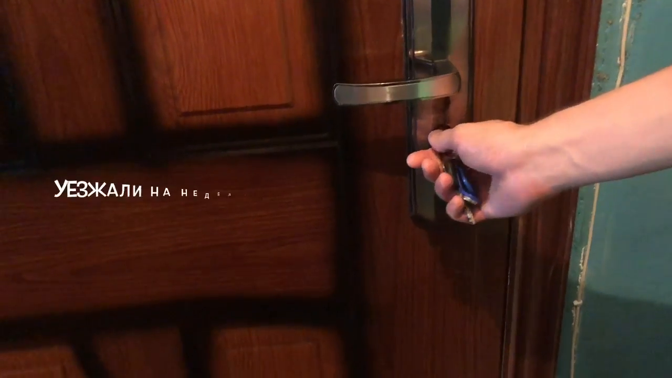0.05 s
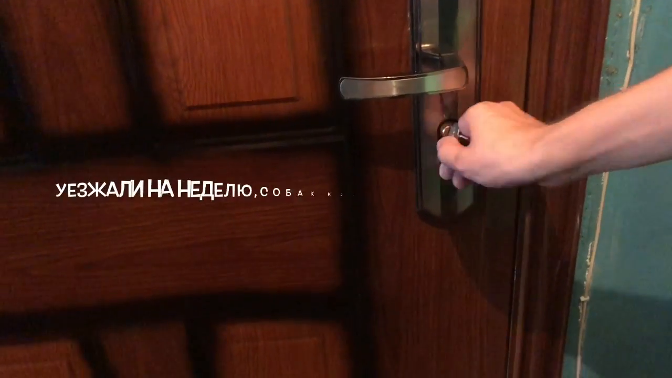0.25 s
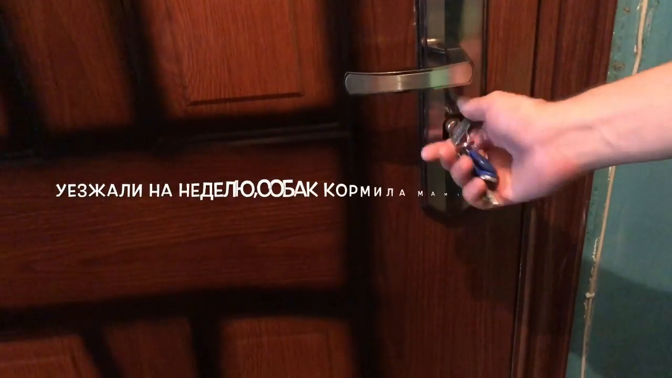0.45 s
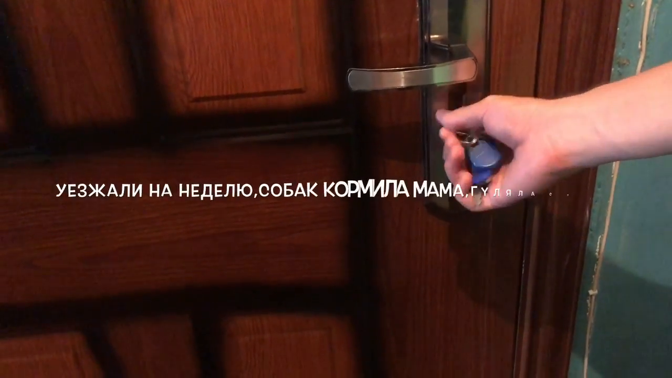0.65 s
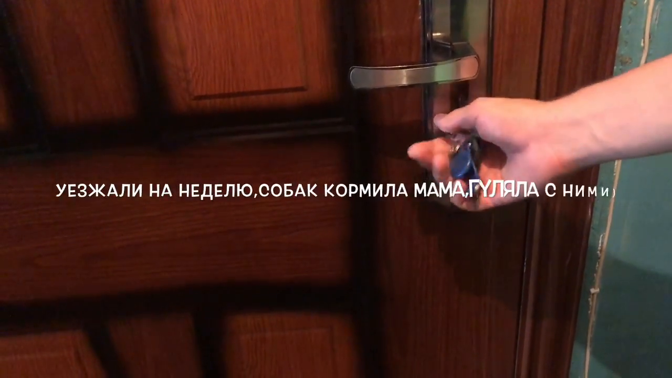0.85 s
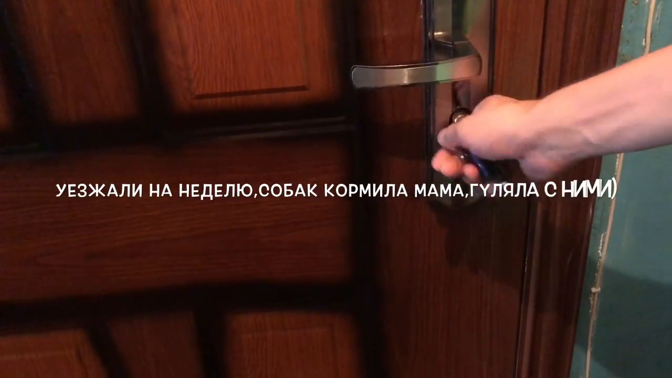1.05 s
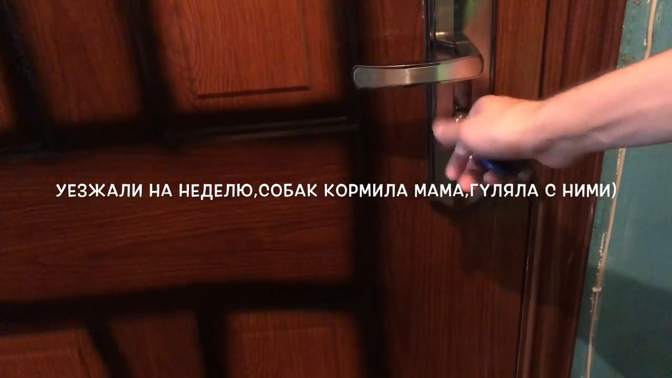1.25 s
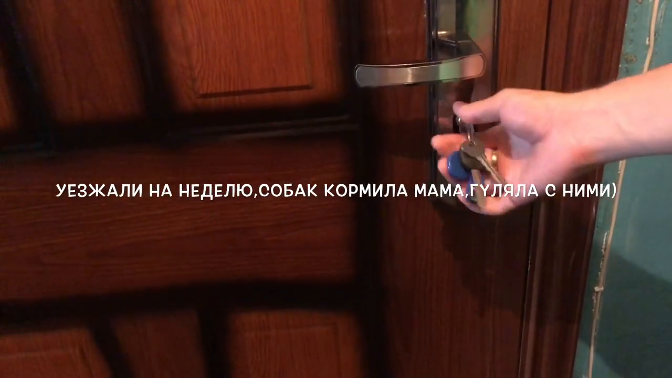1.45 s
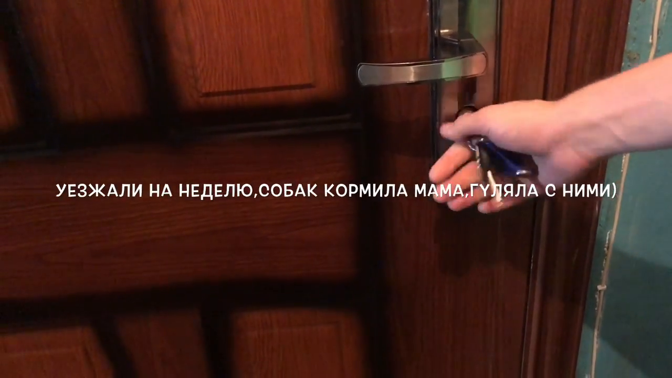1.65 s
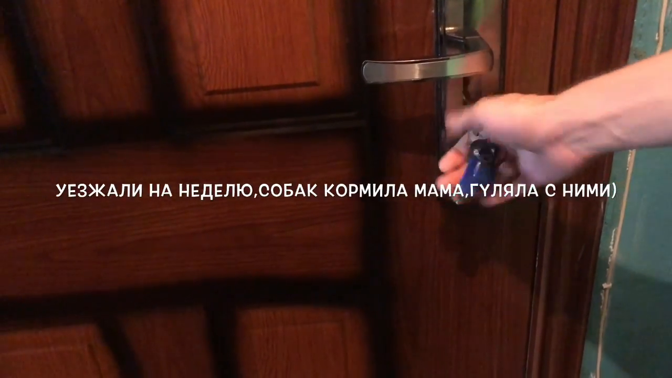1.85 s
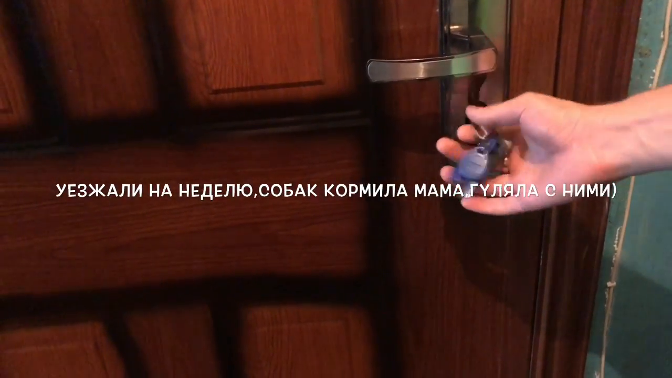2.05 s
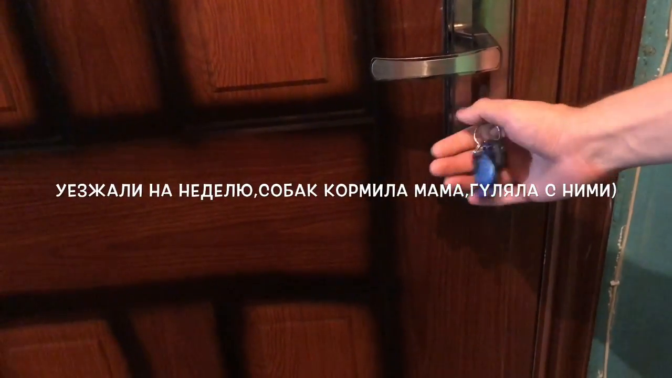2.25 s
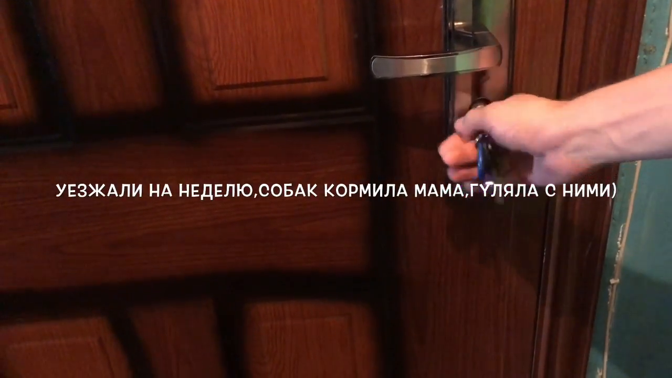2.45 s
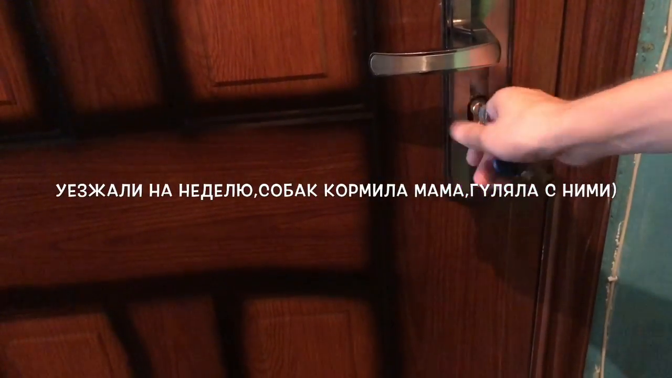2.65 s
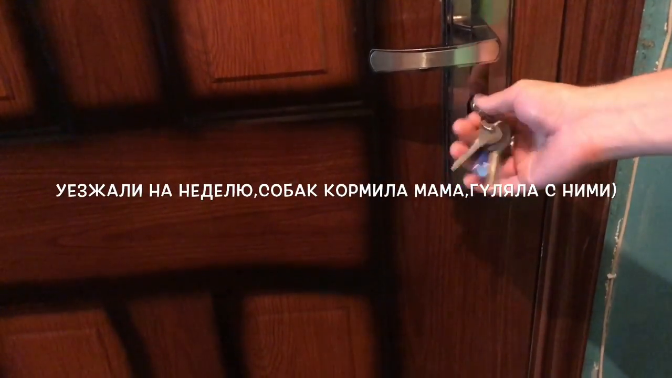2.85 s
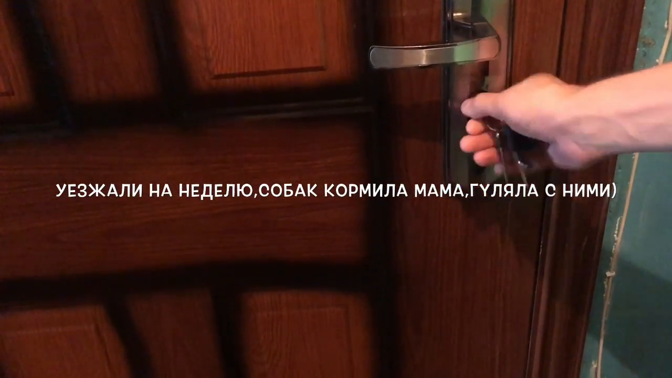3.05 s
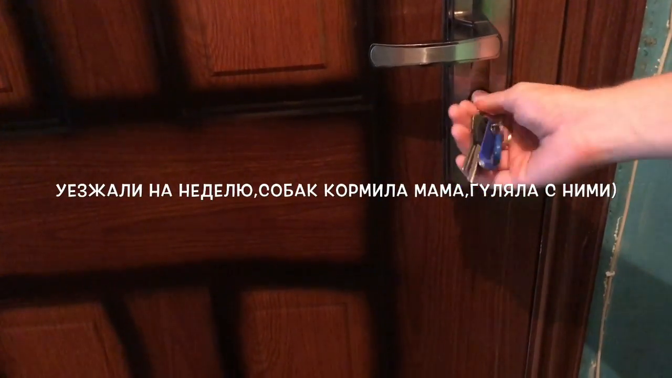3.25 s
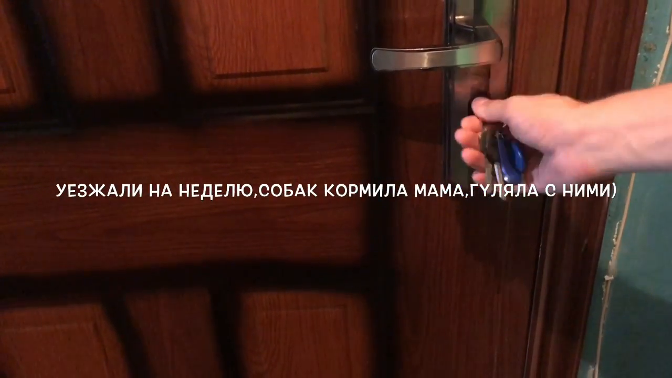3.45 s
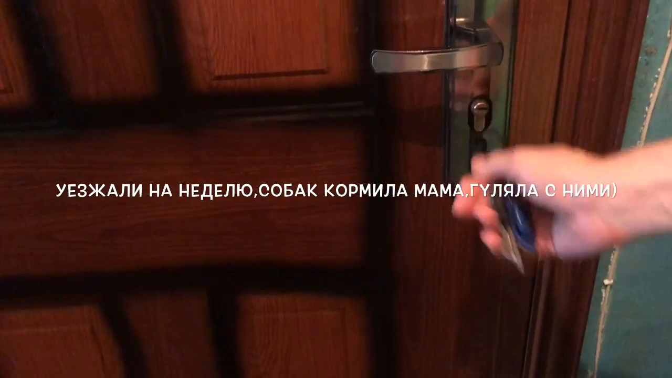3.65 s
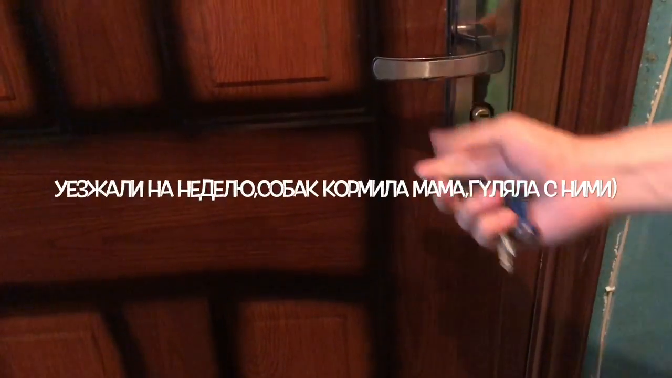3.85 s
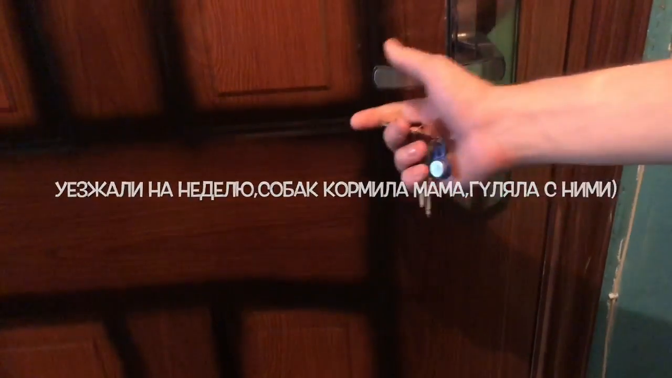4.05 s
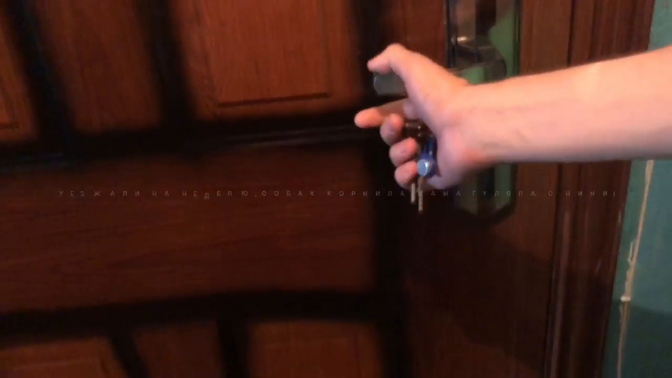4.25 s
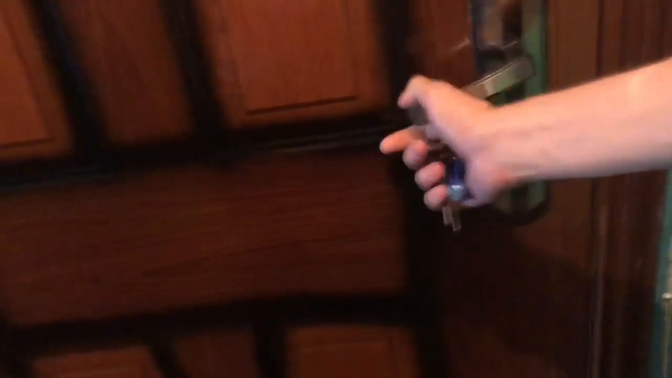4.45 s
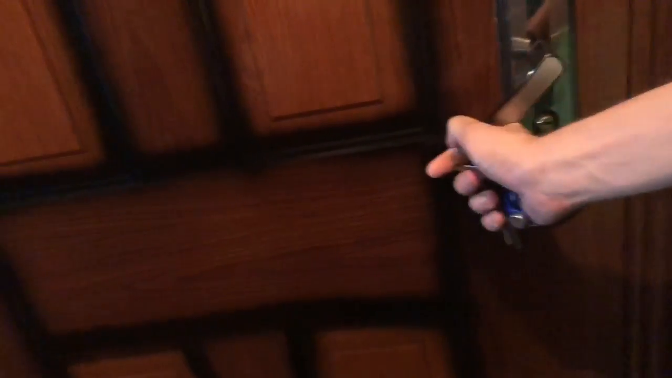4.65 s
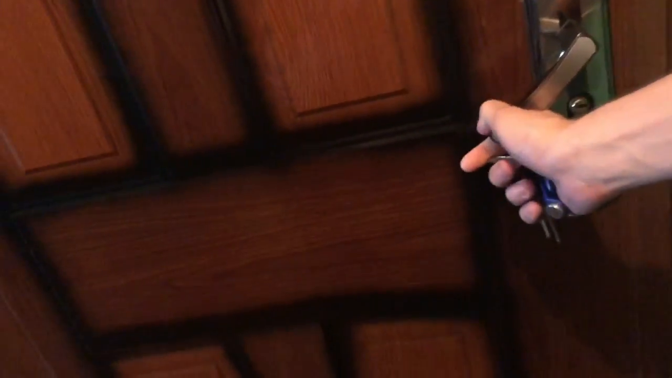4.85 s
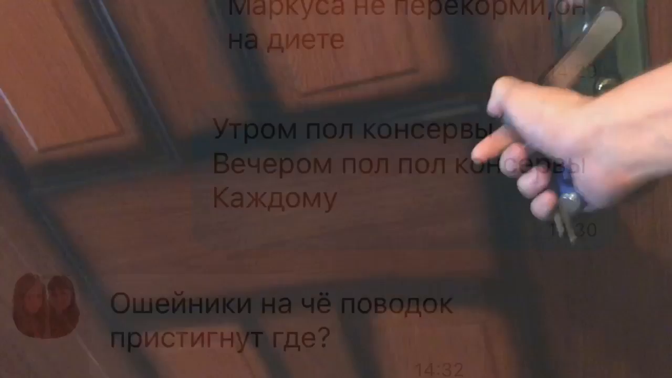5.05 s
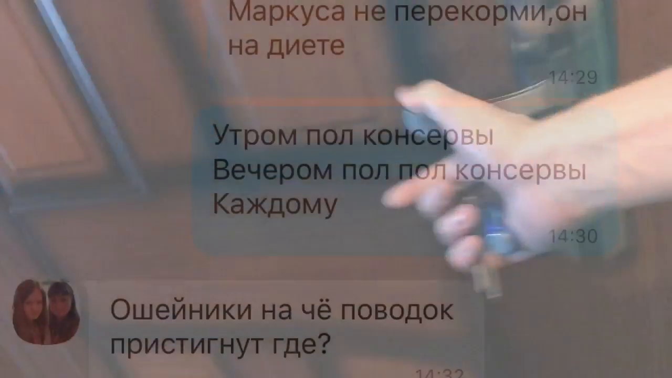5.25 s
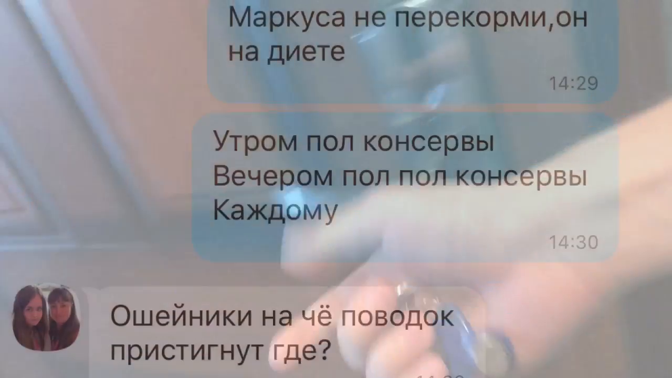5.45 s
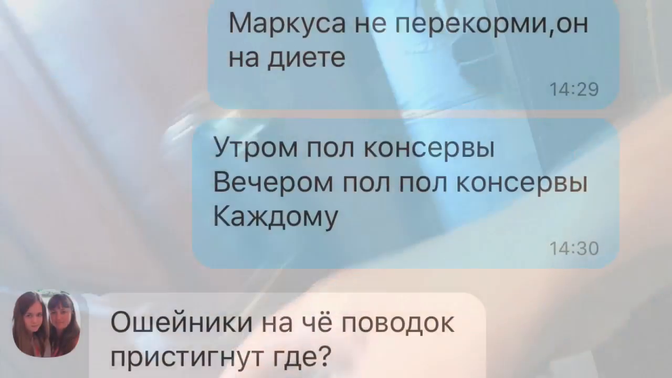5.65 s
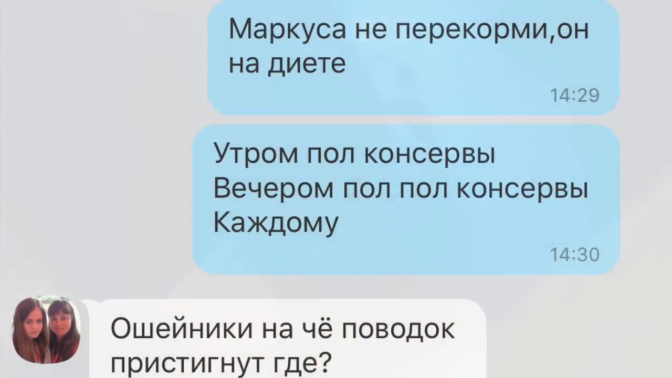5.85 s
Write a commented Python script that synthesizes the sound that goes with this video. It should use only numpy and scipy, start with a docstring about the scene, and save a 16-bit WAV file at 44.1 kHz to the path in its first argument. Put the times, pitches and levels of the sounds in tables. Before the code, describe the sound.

In a hard, echoing stairwell, with soft hiss and low rumble, keys are heard at about arm's length. From 0.2 s they clink lightly, with a tiny knock at 0.4 and a faint low hum around 0.5-1.3. A dense jingle at 0.7-1.05 leads into two firm bolt clacks at 1.1 and 1.2, resounding in the door leaf. After a short lull, the keys rattle again from 1.5, brightest and busiest at 1.85-2.25, then hard lock clacks follow at 2.5-2.65. More sharp clinks come at 2.95-3.35. From 3.55 to 4.05 the key scrapes out amid jingling, with a strong clink at 3.8 and a tap leaving a thin metallic ring at 4.0. Then the keys fall quiet: small knocks, handle clunks at 4.6-4.7 with deep thuds, the door shifting around 4.9, light clicks at 5.2-5.4, rubbing, and a barely audible rising hinge squeak at 5.5 as everything fades.

```python
"""Keys clink and rattle in the hand, bolt and latch knock the door leaf, and a hinge squeaks faintly at the end.
The bunch turns twice in a steel door lock on a hard stairwell landing, is pulled out, and the handle is pressed.
Keys and lock are bursts of chattering noise driving resonances; lever, hinge and a low hum are sines.
Shaped noise makes the hand on the door, the rubbing metal and the air; decaying noise makes the echo."""
import sys
import numpy as np
from scipy import signal
from scipy.fft import rfft, irfft, next_fast_len
from scipy.io import wavfile
from scipy.ndimage import map_coordinates

SR = 44100
rng = np.random.default_rng(int(sys.argv[2]) if len(sys.argv) > 2 else 0)


def log_audio(samples):
    """Write samples as a 16-bit WAV file to the path given in sys.argv[1]."""
    # one column per channel
    frames = np.atleast_2d(samples).T
    # limit to full scale, then quantise
    limited = np.clip(frames, -1, 1)
    pcm = np.round(limited * 32767).astype(np.int16)
    wavfile.write(sys.argv[1], SR, pcm)


N = 260190  # samples, 5.9 s

# Key on key. Each row: start in seconds, level in dB, ring pitch in Hz, balance of the long keys in dB,
# decay time of the contact in ms.
CLINKS = [(0.218, -22.5, 14500, -16, 3.7), (0.277, -29, 15600, -13.5, 7.7), (0.504, -39, 15500, -36, 21),
          (0.534, -36.5, 15500, -40, 5.8), (0.6744, -22, 15700, -3, 5), (0.7764, -21.5, 13540, -21.5, 10.4),
          (0.8041, -22.5, 7700, -13, 5.3), (0.8218, -24, 12140, -10, 6.8), (0.888, -30, 14370, -18.5, 2.1),
          (0.897, -20.5, 15000, -0.5, 1.4), (0.921, -28.5, 11100, -12, 1.6), (0.9288, -25, 7740, -8, 7),
          (1.0132, -21.5, 10200, -4, 10.4), (1.0332, -25, 7460, -6, 22), (1.055, -23.5, 14700, -22, 1.8),
          (1.5235, -37, 7770, -3.5, 4.8), (1.5556, -35, 3620, 2.5, 4), (1.627, -37.5, 5200, -3, 2),
          (1.646, -32.5, 12300, 2.5, 8), (1.6878, -28, 4500, 0, 2.8), (1.746, -23.5, 15500, -1, 2.6),
          (1.7797, -24.5, 4800, 2, 2.8), (1.8204, -32, 14980, 3, 8.1), (1.8662, -9, 10800, -6.5, 4.6),
          (1.894, -26, 8000, -18, 6.8), (1.9022, -17.5, 10900, -3.5, 6.1), (1.9141, -22.5, 10940, -28, 2.4),
          (1.993, -28.5, 14900, 2, 4.5), (2.0016, -18, 7460, -11, 8.7), (2.0052, -20.5, 7750, 1, 2.6),
          (2.042, -25, 14970, -6, 3.8), (2.052, -19, 14800, -35, 3.3), (2.124, -28, 11700, -11, 3.9),
          (2.148, -22, 14900, 1.5, 0.75), (2.1807, -15.5, 11540, -5.5, 5.9), (2.189, -19, 7700, -21.5, 7.1),
          (2.253, -30, 7940, -5, 7.4), (2.509, -35, 5560, -12, 1.5), (2.752, -24.5, 7700, -3.5, 1.4),
          (2.7568, -25.5, 3500, -1, 1.7), (2.933, -40.5, 3580, 7, 3.5), (2.965, -22.5, 9460, -22, 5.6),
          (3.0103, -14, 12520, -11, 4.6), (3.0178, -15.5, 11800, -13.5, 2.6), (3.067, -21, 15900, -10, 2.8),
          (3.0763, -19, 14400, -16.5, 3.9), (3.087, -26, 15000, -7, 1.3), (3.168, -25, 15040, -10.5, 4.3),
          (3.289, -18.5, 15150, -12, 2.5), (3.296, -26.5, 14400, -13, 11), (3.3375, -28, 15200, -26, 2.6),
          (3.543, -18, 12500, -7, 8.8), (3.5775, -25.5, 8100, -9, 17), (3.613, -26.5, 12360, -2, 4.9),
          (3.6328, -21.5, 12800, -25, 0.47), (3.6705, -26, 14400, -6, 5), (3.7773, -20, 15200, -15.5, 22),
          (3.803, -10, 14500, -23, 2), (3.812, -33, 7740, -13, 3.8), (3.837, -30.5, 7600, 1, 6.5),
          (3.8633, -37, 14900, -12, 7.6), (3.8934, -32, 14500, 5, 3.4), (3.902, -25.5, 8500, -14, 4.8),
          (3.9136, -20.5, 15100, -9, 5), (3.9936, -16.5, 7250, -8.5, 4), (4.001, -22.5, 11500, -5, 5.3),
          (4.018, -25, 15000, 0, 0.83), (4.051, -24.5, 16000, -4, 1.1)]
# Blows of bolt, latch and handle. Each row: start in seconds, clack level in dB, door leaf in dB against
# the clack, depth of the thud in dB, steel snap in dB against the clack.
KNOCKS = [(0.4339, -40.5, -8.5, -6, -10.5), (0.7821, -39.5, -6, -6, 0.5), (1.0988, -27.5, -2, 3.5, -8.5),
          (1.1866, -22.5, -5.5, 2.5, -8), (1.6909, -34, -1.5, 3.5, -2), (2.4981, -34.5, 1, 0, -3),
          (2.5169, -24, -3.5, -0.5, -1.5), (2.6276, -22, -26, -6, -7), (2.6334, -27, 5, 1, 5.5),
          (3.5367, -40, 4, 2, -8), (3.5989, -49, 11.5, 6, 6), (3.6388, -58.5, 15, -2, -8),
          (3.6844, -34.5, -7, -7.5, -17), (4.12, -44.5, -3, 10.5, -7), (4.2938, -49.5, -1.5, -5, 8),
          (4.4248, -40.5, 1.5, 5, -10), (4.5943, -35.5, -14.5, 16.5, -5.5), (4.6121, -30, -8.5, 3, 0),
          (4.6885, -27, 1.5, 3, -4), (4.7355, -45, 5, -4, 4), (4.8997, -47, -18, 21, -2),
          (5.08, -43.5, -3, 7, -7.5), (5.1494, -46, -5, -7.5, -9), (5.2352, -50, 5.5, -6.5, -27),
          (5.3047, -44, -20, 4, -0.5), (5.3324, -35.5, -3, 3, -5), (5.3727, -38.5, -1, -5.5, 5.5)]
# The faint hinge squeak: start in seconds, hold in seconds, level in dB.
SQUEAK = (5.5, .14, -68)
# The lever ringing after a key taps it. Each row: pitch in Hz, level in dB, t60 in seconds.
LEVER_RINGS = [(2350, -59, .3), (7176, -43, .62), (11390, -45, .35)]
# Resonances of the door leaf. Each row: centre in Hz, width in Hz, relative level in dB.
DOOR_MODES = [(131.2, 49.5, 0), (196.4, 25, 5.5), (265, 30, 3), (343.3, 45, 2), (445.7, 49, -1.5),
              (589, 145, -6), (947, 690, -11.5)]
# Tone of the clack in the lock case. Each row: frequency in Hz, relative density in dB per Hz.
LOCK_CASE_TONE = [(700, 1.5), (1150, 6), (1650, 2.5), (2300, -4.5), (3500, -11), (5000, -31)]
# Tone of the snap in the steel bolt. Each row: frequency in Hz, relative density in dB per Hz.
BOLT_TONE = [(1350, -7), (2300, -6.5), (3200, -7.5), (3700, -1.5), (4300, -6.5), (6040, -4.5), (6800, -9),
             (8400, -7), (12500, -12.5), (16000, -12)]
# Resonances of the lock plate. Each row: centre in Hz, width in Hz, relative level in dB.
PLATE_MODES = [(3666, 100, 0), (4340, 30, -3.5), (5460, 43, -11), (5810, 81, -6.5), (7170, 82, -8.5),
               (8640, 31, -8.5), (9020, 38, -9)]
# Tone of the low rumble. Each row: frequency in Hz, relative density in dB per Hz.
RUMBLE_TONE = [(20, -70), (28, -48), (38, -13), (45, 0.5), (60, 11), (90, -1), (140, -40.5)]
# Tone of the stairwell hiss. Each row: frequency in Hz, relative density in dB per Hz.
HISS_TONE = [(200, -6), (480, -19), (890, -20.5), (6770, -39.5), (9800, -43), (16000, -64.5)]
# Echo decay of the stairwell. Each row: frequency in Hz, t60 in seconds.
ECHO_DECAY = [(100, 0.96), (700, 0.73), (1840, 1.17), (4850, 1.08), (12800, 0.38)]
# Treble limit of the whole scene, a steep drop near 16 kHz. Each row: frequency in Hz, gain in dB.
TREBLE_LIMIT = [(15750, 1.5), (16000, -38.5)]
# Resonances of the bunch of keys. Each row: centre in Hz, width in Hz, relative level in dB.
KEY_MODES = [(1795, 200, -8.5), (3500, 700, -8.5), (4600, 460, -4), (6230, 1200, -9.5), (7690, 236, 0.5),
             (8275, 270, 0), (9180, 990, -8), (10910, 670, -8), (11550, 240, -6.5), (12500, 1900, -28),
             (13830, 240, -8.5), (14950, 2750, 0)]
# Tone of rubbing metal. Each row: frequency in Hz, relative density in dB per Hz.
RUB_TONE = [(300, 1.5), (900, -3.5), (3000, -1), (5500, -11.5), (16000, -14)]
# The hand shakes the bunch. Each row: start in seconds, hold in seconds, level in dB before the rattle trim.
SHAKES = [(.2, 0.13, -56), (.5, 0.27, -50.5), (.68, 0.11, -52), (.82, 0.17, -41), (1.63, 0.17, -39.5),
          (1.86, 0.035, -39), (2.14, 0.058, -31.5), (2.5, 0.13, -40), (2.96, .08, -33), (3.25, 0.13, -49),
          (3.55, 0.18, -51.5), (3.8, 0.039, -37.5), (4.0, .04, -85)]
# Key rubs in the lock or handle in its seat. Each row: start in seconds, hold in seconds, level in dB.
RUBS = [(3.56, 0.12, -58.5), (4.2, 0.022, -56.5), (4.43, 0.036, -57), (5.31, 0.035, -54), (5.42, 0.32, -58)]
# The door leaf under the hand. Each row: time in seconds, level in dB.
GRIP = [(0, -62.5), (1.05, -49), (1.6, -52), (2.4, -52.5), (3, -50.5), (3.5, -56), (4.1, -63), (4.9, -46),
        (5.3, -60), (5.9, -62)]
# Level of the whole scene, lowest at the end. Each row: time in seconds, gain in dB.
FADE = [(0, -1), (.5, -0.5), (5.4, 0.5), (5.9, -10.5)]

LONG_KEYS_BELOW_HZ = 7000
CHATTER_DB, CHATTER_SAMPLES = 4, 32  # spread of a contact's ticks, their spacing
PANEL_DB, DEEP_DB = 5, -9  # panel knock and deep thud against the boom, at depth 0
SHAKE_RISE, SHAKE_FALL = 410, 113  # dB per s
RUB_RISE, RUB_FALL = 260, 190  # dB per s
RUMBLE_DB, HISS_DB = -55.5, -60
RUMBLE_PER_GRIP = 0.21  # dB of rumble for each dB of grip
HUM = (0.49, 0.8, -54)  # start s, hold s, dB
HUM_HZ, HUM_RISE, HUM_FALL = 98, 20, 80  # slopes in dB per s
HANDLE_TAP = 3.994  # s
SQUEAK_HZ, SQUEAK_HZ_PER_S = 2130, 220  # pitch at the start, upward glide
SQUEAK_RISE, SQUEAK_FALL = 300, 80  # dB per s
TOP_HZ = 16990  # band limit


def amp(db):
    """Decibels to gain."""
    return 10 ** (np.asarray(db) / 20)


def unit(x):
    """Scale to rms 1."""
    return x / np.sqrt(np.mean(x ** 2) + 1e-20)


def along(points, hz):
    """Read (Hz, value) points on a log frequency axis."""
    f, v = np.transpose(points)
    return np.interp(np.log(hz + 1), np.log(f + 1), v)


def curves(rows):
    """Draw one value per sample for each column after the time."""
    s, *cols = np.transpose(rows)
    return [np.interp(np.arange(N) / SR, s, c) for c in cols]


def wobble(rate):
    """A smooth random curve with rate knots a second."""
    knots = rng.standard_normal(int(N * rate / SR) + 4)
    return map_coordinates(knots, [np.arange(N) * rate / SR])


def swells(rows, rise, fall):
    """The gain of gestures that rise to their start, hold and fall away, slopes in dB per s."""
    t = np.arange(N) / SR
    gain = 0
    for s, hold, db in rows:
        before = np.clip(s - t, 0, None)
        after = np.clip(t - s - hold, 0, None)
        gain = gain + amp(db - rise * before - fall * after)
    return gain


def filtered(x, response):
    """Filter x by a complex frequency response, scaled so that its impulse has energy 1."""
    m = next_fast_len(N + SR // 2)
    h = response(np.fft.rfftfreq(m, 1 / SR))
    h = h / np.sqrt(np.mean(np.abs(h) ** 2))
    return irfft(rfft(x, m) * h, m)[..., :N]


def resonance(f, centre, width):
    """The causal band-pass response of one damped mode."""
    return 1j * f * width / (centre ** 2 - f * f + 1j * f * width)


def modes(table):
    """A body of several resonances, neighbours in opposite polarity."""
    return lambda f: sum((-1) ** k * amp(db) * resonance(f, centre, width)
                         for k, (centre, width, db) in enumerate(table))


def colour(points):
    """The smooth response of a (Hz, dB) spectrum."""
    return lambda f: amp(along(points, f))


def bursts(db, ms, size):
    """The force of rough contacts, one row each: chattering noise that swells fast and dies away."""
    u = np.arange(size) / SR * 1000 / np.clip(ms, .1, 30)[:, None]  # time in decay times
    ticks = rng.standard_normal((len(u), size // CHATTER_SAMPLES + 1))
    ticks = np.repeat(ticks, CHATTER_SAMPLES, axis=1)[:, :size]
    chatter = amp(CHATTER_DB * ticks)
    chatter /= np.sqrt(np.mean(chatter ** 2))
    envelope = amp(db[:, None] - 5.86 * u) * (1 - np.exp(-u / 0.079))
    return rng.standard_normal(u.shape) * chatter * envelope


def placed(s, rows):
    """Lay out rows of samples at their times."""
    at = np.round(s * SR).astype(int)[:, None] + np.arange(rows.shape[1])
    return np.bincount(at.ravel(), rows.ravel(), N + SR)[:N]


def contacts(s, db, ms):
    """Contact forces along the time line."""
    return placed(s, bursts(db, ms, size=SR // 16))


def struck(force, long_db, scatter_db):
    """Each contact shares its energy among the modes of the bunch in its own way; the long keys ring lowest."""
    f = np.fft.rfftfreq(force.shape[1], 1 / SR)
    hz, width, db = np.transpose(KEY_MODES)
    long_keys = hz < LONG_KEYS_BELOW_HZ
    gains = amp(db + scatter_db * rng.standard_normal((len(force), len(hz))))
    for group in (long_keys, ~long_keys):  # even out the energy of each group
        energy = gains[:, group] ** 2 @ width[group] / SR
        gains[:, group] /= np.sqrt(energy)[:, None]
    gains *= amp(np.outer(long_db, long_keys))
    polarity = (-1) ** np.arange(len(hz))[:, None]
    shapes = polarity * resonance(f, hz[:, None], width[:, None])
    shapes *= f * f / (f * f + 2600 ** 2)  # small bodies radiate little bass
    return irfft(rfft(force) * (gains @ shapes), force.shape[1])


def air():
    """Rumble noise swells as the door is shaken, under soft stairwell hiss and a wavering low hum."""
    rumble = unit(filtered(rng.standard_normal(N), colour(RUMBLE_TONE)))
    grip_db = curves(GRIP)[0]
    hiss = unit(filtered(rng.standard_normal(N), colour(HISS_TONE)))
    hum_gain = swells([HUM], HUM_RISE, HUM_FALL) * amp(4.3 * wobble(3.3))
    hum = hum_gain * np.sin(2 * np.pi * np.cumsum(HUM_HZ + 3 * wobble(5.0)) / SR)
    rumble_db = RUMBLE_DB + RUMBLE_PER_GRIP * (grip_db - grip_db.mean()) + 1.2 * wobble(8.6)
    return amp(rumble_db) * rumble + amp(HISS_DB) * hiss + hum


def hand():
    """The grip shakes the door leaf in lumps of noise; key and handle rub in their seats."""
    leaf = filtered(rng.standard_normal(N) * amp(2.8 * wobble(25)), modes(DOOR_MODES))
    rub = filtered(rng.standard_normal(N) * amp(2.7 * wobble(150)), colour(RUB_TONE))
    shaken = amp(curves(GRIP)[0]) * unit(leaf)
    return shaken + swells(RUBS, RUB_RISE, RUB_FALL) * unit(rub)


def rattle(count=1000):
    """Many small contacts of unequal size strike the bunch while the hand moves."""
    when, size, ms = rng.random((count, 3)).T
    force = bursts(-5 * np.log(size + 0.02), .5 + 1.3 * ms, size=512)
    bunch = placed(when * 4.2, struck(force, np.full(count, -5.), scatter_db=3.5))
    return amp(-6.5) * swells(SHAKES, SHAKE_RISE, SHAKE_FALL) * unit(bunch)


def keys():
    """Each clink shakes the bunch, and one key rings out as a brief decaying sine."""
    s, db, hz, long_db, ms = np.transpose(CLINKS)
    shake = struck(bursts(0 * db, ms, size=4096), long_db - 1.0, scatter_db=4.5)
    t = np.arange(shake.shape[1]) / SR
    ring_db = np.where(hz < LONG_KEYS_BELOW_HZ, long_db, 0)
    envelope = amp(ring_db[:, None] - 60 * t / 0.0097) * (1 - np.exp(-t / 0.00019))
    rings = envelope * np.sin(2 * np.pi * hz[:, None] * t)
    clinks = shake + amp(7.5) * rings
    # strong long keys add to the level of their clink
    loudest = np.abs(clinks).max(axis=1) * amp(-np.maximum(long_db, 0))
    return placed(s, clinks * (amp(db + 0.5) / loudest)[:, None])


def stairwell(x, count=12):
    """Noise tails whose frequencies die at their own speed; each slice of time gets a fresh tail."""
    out, step = np.zeros(N + 2 * SR), N // count + 1
    for k in range(count):
        hz, t, z = signal.stft(rng.standard_normal(3 * SR // 2), SR, nperseg=256)
        decay = amp(-60 * t / along(ECHO_DECAY, hz)[:, None])
        tail = signal.istft(z * decay, SR, nperseg=256)[1]
        wet = signal.fftconvolve(x[k * step:][:step], tail / np.linalg.norm(tail))
        start = k * step + 200  # the echo enters 200 samples late
        out[start:][:len(wet)] += wet[:len(out) - start]
    return out[:N]


def lock():
    """Each blow snaps in the steel, clacks in the lock case, knocks the panel and booms in the door leaf.

    Returns the direct sound, and what the whole leaf sends into the stairwell, excited by clean pushes."""
    s, db, boom_db, depth_db, snap_db = np.transpose(KNOCKS)
    panel_db = boom_db - depth_db + PANEL_DB
    deep_db = boom_db + depth_db + DEEP_DB
    ms = np.clip(5.5 + 0.22 * (db + 30), 1.5, 7)  # light blows are short

    def push(level_db):
        return placed(s + 0.0034, amp(level_db)[:, None])

    boom = filtered(push(db + boom_db + 20.5), modes(DOOR_MODES[2:5]))
    thud = filtered(push(db + deep_db + 24.5), modes(DOOR_MODES[:2]))
    panel = filtered(push(db + panel_db + 11), modes(DOOR_MODES[5:]))
    leaf = boom + thud + panel
    snap = filtered(contacts(s, db + snap_db + 1, ms), colour(BOLT_TONE))
    plate = filtered(contacts(s, db + snap_db - 11, 3 * ms), modes(PLATE_MODES))
    clack = filtered(contacts(s, db - 4, 1.26 * ms), colour(LOCK_CASE_TONE))
    spread_snap = filtered(push(db + snap_db + 12), colour(BOLT_TONE))
    spread_clack = filtered(push(db + 15), colour(LOCK_CASE_TONE))
    return snap + plate + clack + leaf, spread_snap + spread_clack + leaf


def handle():
    """A key taps the lever, which rings on as decaying sines with a growing flutter."""
    t = np.clip(np.arange(N) / SR - HANDLE_TAP, 0, None)
    ringing = 0
    for hz, db, t60 in LEVER_RINGS:
        flutter = amp(5 * np.clip(t / .04, 0, 1) * wobble(35))
        ringing = ringing + amp(db - 60 * t / t60) * flutter * np.sin(2 * np.pi * hz * t)
    return ringing


def hinge():
    """A thin broken squeak, an unsteady sine and its stronger octave, as the door starts to swing."""
    hz = SQUEAK_HZ + SQUEAK_HZ_PER_S * (np.arange(N) / SR - SQUEAK[0])
    turn = 2 * np.pi * np.cumsum(hz + 22 * wobble(120)) / SR
    slips = amp(3.5 * wobble(60))
    tone = np.sin(turn) + amp(3.0) * np.sin(2 * turn)
    return swells([SQUEAK], SQUEAK_RISE, SQUEAK_FALL) * slips * tone


def scene():
    """Keys at arm's length; the door feeds the stairwell more strongly than they do."""
    bunch = keys() + rattle()
    blows, spread = lock()
    direct = bunch + handle() + blows + hinge() + hand()
    echo = stairwell(amp(-11.5) * bunch + amp(2.0) * spread)
    return (direct + echo + air())[None]


def record(dry):
    """Shape the overall level; the treble drops steeply near 16 kHz and ends at the band limit."""
    m = next_fast_len(N + SR)
    hz = np.fft.rfftfreq(m, 1 / SR)
    response = amp(along(TREBLE_LIMIT, hz)) * (hz < TOP_HZ)
    faded = dry * amp(curves(FADE)[0])
    return irfft(rfft(faded, m) * response, m)[..., :N]


dry = scene()
out = record(dry)
log_audio(out)
```